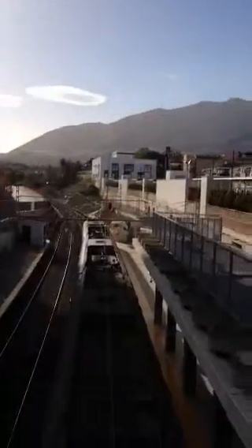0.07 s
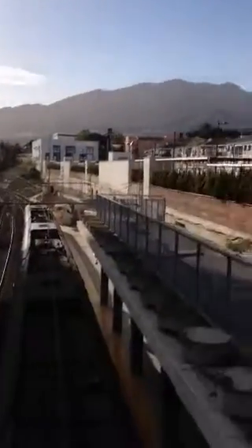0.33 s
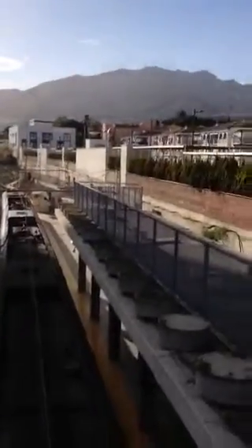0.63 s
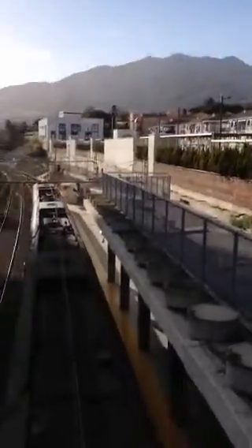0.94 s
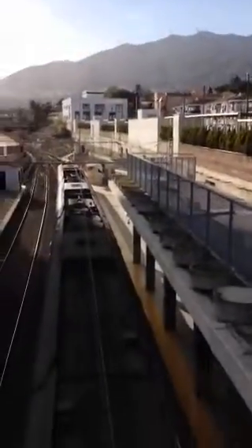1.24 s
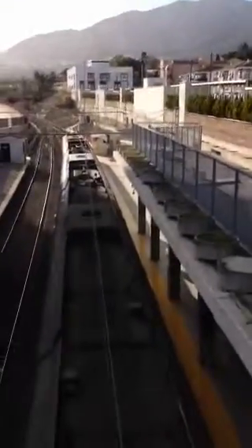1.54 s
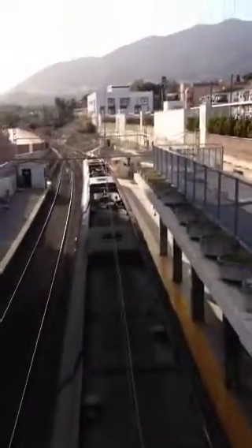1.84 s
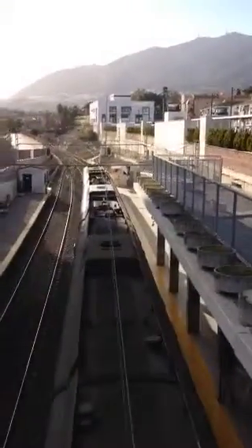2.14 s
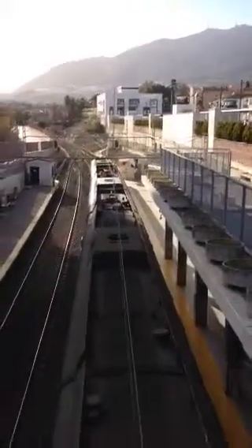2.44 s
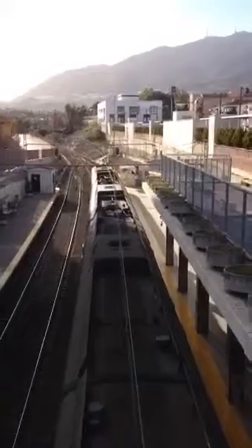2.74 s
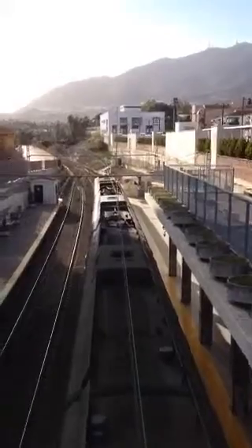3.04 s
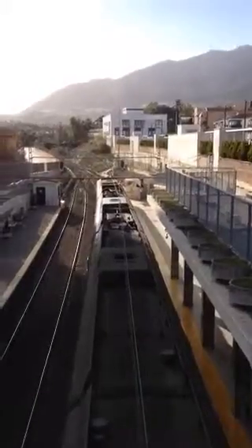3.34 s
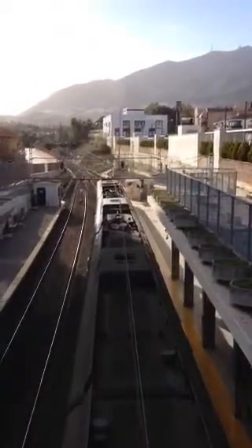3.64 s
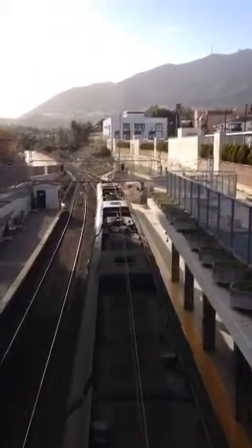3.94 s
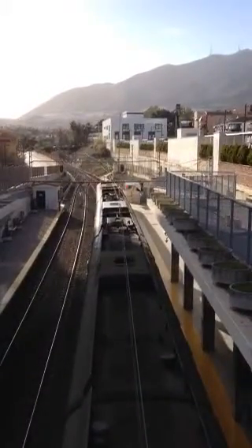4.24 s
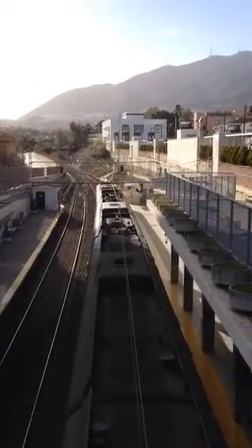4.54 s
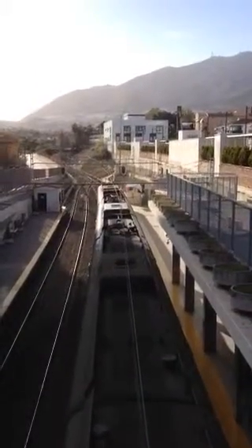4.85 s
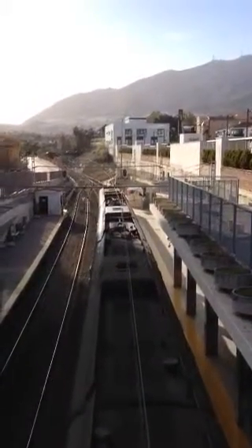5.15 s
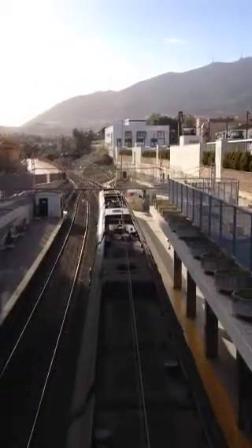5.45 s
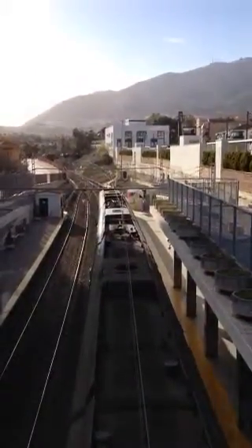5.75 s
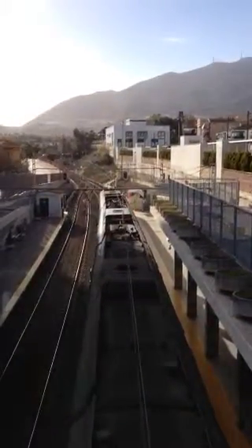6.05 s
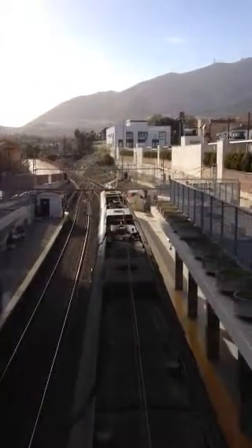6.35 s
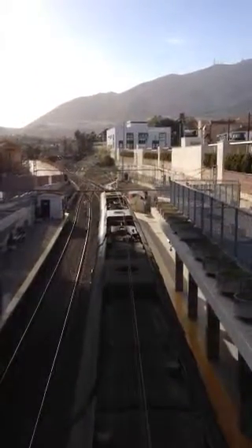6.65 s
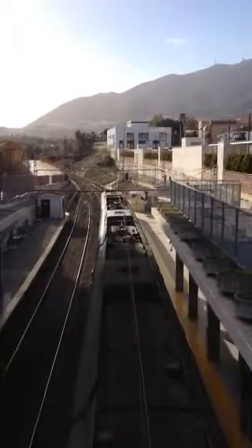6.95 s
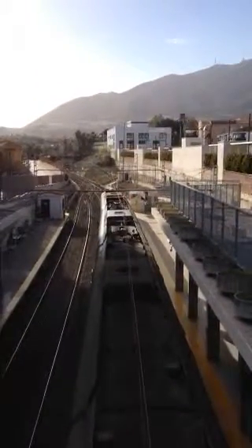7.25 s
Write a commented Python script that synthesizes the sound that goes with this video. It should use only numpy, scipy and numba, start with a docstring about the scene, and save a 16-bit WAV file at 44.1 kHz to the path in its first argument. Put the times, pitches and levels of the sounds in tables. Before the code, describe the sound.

An electric train stands at a station platform, its motors humming low and its cooling fans rushing steadily. After about a second and a half, a finger knocks and rubs loudly on the microphone several times and covers it. The rush cuts off and the sound turns dull and much quieter. A faint muffled hum with a little hiss carries on to the end.

```python
"""Standing train, covered microphone

An electric train stands at a platform below a footbridge: its motors and converter hum, its fans rush.
A finger rubs and knocks over the microphone port, then seals it. The narrowing leak cuts off
the rush, leaving a muffled hum and the microphone's own hiss."""
import sys
import numpy as np
from scipy import signal
from scipy.fft import rfft, irfft
from scipy.io import wavfile
from scipy.ndimage import uniform_filter1d, minimum_filter1d
from numba import njit

SR = 44100
rng = np.random.default_rng(int(sys.argv[2]) if len(sys.argv) > 2 else 0)


def dump_mix(stems):
    """Bounce the given channels to the path in sys.argv[1] as a 16-bit WAV at rate SR."""
    frames = np.atleast_2d(stems).T  # one column per channel
    limited = np.clip(frames, -1, 1)  # hard clip at full scale
    pcm = np.round(limited * 32767).astype(np.int16)
    wavfile.write(sys.argv[1], SR, pcm)


N = 321930
TIME = np.arange(N) / SR

WHINE_HZ, WHINE_DB, WHINE_FADE_S = 1235.5, -50.5, 0.077
MOVE_START_S, MOVE_END_S = 1.07, 1.3
# motor and converter tones: f/Hz, level/dB, change as the phone moves/dB, unsteadiness/0-1
MACHINE_TONES = [(147.3, -34, -2, .12), (212.4, -35, -11.5, 0.5), (296.3, -38, -3.5, 0.4),
                 (344.4, -45.5, -9.5, 0.6), (554.2, -44, -4, 0), (586.6, -47.5, -3.5, 1),
                 (879, -64, 12.5, 0.9), (1180, -62.5, 6.5, 0.39), (1170, -67, 2.5, 0.8),
                 (1564, -62, 6, 0.8), (1647, -67.5, 10, 0.6), (1880, -61, 3, 0.3)]
# thin whine: start/s, end/s
WHINE_SPANS = [(1.12, 1.9), (6.12, 7.3)]


def machines():
    """Motors and converter hum with a shared pitch waver; a thin whine comes and goes."""
    clock_s = np.cumsum(1 + 0.00064 * walk(1.8)) / SR
    # each tone has its own pattern over the platform, so moving shifts each level differently
    moved = np.interp(TIME, (MOVE_START_S, MOVE_END_S), (0, 1))
    hum = sum(undb(db + change_db * moved) * tone(hz, clock_s, sway)
              for hz, db, change_db, sway in MACHINE_TONES)
    whining = sum(swell(start, end, WHINE_FADE_S, WHINE_FADE_S) for start, end in WHINE_SPANS)
    return hum + undb(WHINE_DB) * whining * tone(WHINE_HZ, clock_s, sway=0.333)


# rushing air: f/Hz, density/(dB per Hz)
AIR_SPECTRUM = [(25, -101), (60, -90), (110, -68), (260, -60.5), (420, -68), (900, -68.5), (1500, -73.5),
                (2300, -79.5), (3400, -83), (4500, -79.5), (5300, -88), (7000, -83.5), (9500, -89.5),
                (12500, -87), (15000, -89.5)]
# duct and grille resonances: f/Hz, width/Hz, level/dB
DUCT_MODES = [(104.6, 18, -48), (164.4, 13, -49), (206.5, 15, -39), (284.6, 40, -42), (4650, 420, -56),
              (6150, 620, -58), (6860, 240, -59), (7520, 398, -59.5)]
# treble gain as the hand nears the port: t/s, level/dB
TREBLE_CURVE = [(0, -2.5), (.45, -1.5), (.8, 3), (1.25, 4.5), (1.42, 8.5), (1.52, 1.5)]


def fans():
    """Cooling air rushes; its turbulence rings ducts and grilles."""
    air = coloured(AIR_SPECTRUM) * undb(0.18 * walk(4))
    for hz, width_hz, db in DUCT_MODES:
        level = undb(db + 0.67 * walk(3))
        air += level * narrow_band(rng.standard_normal(N), hz, 0.86 * width_hz / hz)
    treble = signal.sosfilt(signal.butter(1, 5500, "high", fs=SR, output="sos"), air)
    treble_gain = undb(np.interp(TIME, *np.transpose(TREBLE_CURVE)))
    return air + (treble_gain - 1) * treble


OPEN_HZ = 17800
# presses closing the port: start/s, length/s, leak corner after/Hz, air pocket resonance after/Hz
FINGER_PRESSES = [(1.421, 0.059, 1643, 10200), (1.645, 0.091, 320, 1760), (2.23, 0.54, 68.6, 1590)]


def port():
    """Each press glides the leak corner and the trapped air's resonance down."""
    octaves = np.full((2, N), np.log2(OPEN_HZ))
    for start, length, *targets_hz in FINGER_PRESSES:
        progress = np.clip((TIME - start) / length, 0, 1)
        octaves += progress * (np.log2(targets_hz)[:, None] - octaves)
    return 2 ** octaves


def seal(sound, leak_hz, pocket_hz):
    """The leak takes 6 dB/octave; little passes above the trapped air's resonance."""
    # critically damped low + band/2 = one-pole slope
    leaked = filt(sound, "low", leak_hz, 2) + filt(sound, "band", leak_hz, 2) / 2
    return filt(leaked, "low", pocket_hz, 1.385)


SLIPS_PER_S, SKIN_HISS_HZ = 6000, 3020
DARKEN_OCT, FLATTEN_S, LIGHT_TOUCH_OCT = 0.16, 0.018, 0.11
# skin on the case: mid t/s, level/dB, rise/s, hold/s, fall/s, body/Hz, brightness/Hz, relative hiss/dB
RUB_STROKES = [(1.455, -18, 0.011, .02, .012, 302, 2650, -11),
               (1.652, -16, 0.054, 0.012, .015, 300, 1250, -22),
               (1.793, -11, 0.019, 0.006, 0.024, 176, 1027, -38),
               (1.92, -21.5, 0.011, 0.059, 0.015, 323, 1136, -37),
               (2.061, -31, 0.018, 0.011, 0.04, 290, 1280, -27.5)]


def rubs():
    """Skin sticks and slips in dense jerks: a dull roar through the case and a thin dry hiss."""
    slips = (rng.random(N) < SLIPS_PER_S / SR) * rng.standard_normal(N)
    slips += 0.21 * rng.standard_normal(N)
    hiss = unit(filt(filt(slips, "band", SKIN_HISS_HZ, 0.85), "low", 5700, 4.1))
    out = np.zeros(N)
    for t, db, rise, hold, fall, body_hz, bright_hz, hiss_db in RUB_STROKES:
        pressure = swell(t - hold / 2, t + hold / 2, rise, fall)
        # duller as the fingertip flattens, and under a light touch
        flattening = np.tanh((TIME - t) / FLATTEN_S)
        brightness = 2 ** (-DARKEN_OCT * flattening - LIGHT_TOUCH_OCT * (1 - pressure))
        friction = muffled(slips, bright_hz * brightness) / np.sqrt(brightness)
        body = unit(filt(friction, "band", body_hz, 0.6))
        roar = unit(filt(friction, "high", 0.8 * body_hz)) + undb(-4) * body
        out += undb(db) * pressure * (unit(roar) + undb(hiss_db) * hiss)
    return out


KNOCK_OPEN_HZ, KNOCK_SEALED_HZ = 2300, 1120
# fingertip knocks: t/s, peak level/dB
FINGER_KNOCKS = [(1.4421, -10.5), (1.4439, -5), (1.46, -16.5), (1.6334, -12), (1.659, -11), (1.775, -10.5),
                 (1.8037, -7.5), (2.0667, -15.5), (2.2282, -7)]


def knocks(leak_hz, pocket_hz):
    """One pressure pulse per tap: bright on the open port, dull once sealed, where trapped air rings."""
    out, push = np.zeros(N), signal.unit_impulse(2048)
    for t, db in FINGER_KNOCKS:
        now = int(t * SR)
        openness = leak_hz[now] / OPEN_HZ
        bright_hz = KNOCK_SEALED_HZ + openness * (KNOCK_OPEN_HZ - KNOCK_SEALED_HZ)
        thud = filt(muffled(push, bright_hz), "low", pocket_hz[now], damping=0.64)
        add_pulse(out, t, db, thud + 1.8 * filt(thud, "band", 210, 0.81))
    return out


# light fingertip slides: start/s, end/s, level/dB, f/Hz
DRY_SLIDES = [(1.427, 1.443, -30.5, 2980), (1.93, 2.05, -62.5, 4350), (2.135, 2.246, -72, 4500),
              (2.16, 2.19, -71, 14200), (2.316, 2.51, -73, 2260)]


def slides():
    """Skin barely touching the case hisses in one narrow band."""
    friction, out = rng.standard_normal(N), np.zeros(N)
    for start, end, db, hz in DRY_SLIDES:
        contact = swell(start, end, rise_s=0.016, fall_s=0.016)
        out += undb(db) * contact * narrow_band(friction, hz, damping=0.58)
    return out


# dry ticks of the case: t/s, peak level/dB, f/Hz
CASE_TICKS = [(1.5062, -31, 4660), (1.524, -34, 4500), (1.8045, -51, 6050), (2.055, -35, 2450),
              (2.814, -43.5, 1100)]


def ticks():
    """The case clicks faintly under the grip."""
    out, push = np.zeros(N), signal.unit_impulse(2048)
    for t, db, hz in CASE_TICKS:
        click = filt(push, "band", hz, 1.1)
        add_pulse(out, t, db, filt(click, "low", 1.2 * hz))
    return out


# microphone self-noise: f/Hz, density/(dB per Hz)
MIC_SPECTRUM = [(30, -108), (1500, -111), (3000, -114.5), (5000, -117), (9500, -125), (12000, -121),
                (15000, -115)]


def mic_hiss():
    """The microphone's own steady noise, unaffected by the seal."""
    return coloured(MIC_SPECTRUM)


def undb(db):
    """Decibels to gain."""
    return 10 ** (np.asarray(db) / 20)


def unit(x):
    """Scale to rms 1."""
    return x / np.sqrt(np.mean(x ** 2))


def walk(rate_hz):
    """Smooth random drift, rms 1."""
    hz = np.arange(N // 2 + 1) * SR / N
    return unit(irfft(rfft(rng.standard_normal(N)) * np.exp(-(hz / rate_hz) ** 2), N))


def tone(hz, clock_s, sway):
    """Sine drifting in level and phase, rms 1."""
    drift = 1 + sway * (walk(4) + 1j * walk(4))
    return unit(np.real(drift * np.exp(2j * np.pi * (hz * clock_s + rng.random()))))


def coloured(points):
    """Noise shaped by (Hz, dB per Hz) points."""
    hz, db = np.transpose(points)
    bins_hz = np.maximum(np.arange(N // 2 + 1) * SR / N, 1)
    gain = undb(np.interp(np.log(bins_hz), np.log(hz), db))
    return irfft(rfft(rng.standard_normal(N)) * gain, N) * np.sqrt(SR / 2)


@njit
def svf(x, g, damping):
    """State-variable filter, g the prewarped corner per sample; rows low, band, high."""
    y, band_state, low_state = np.empty((3, len(x))), 0., 0.
    for i in range(len(x)):
        band = (band_state + g[i] * (x[i] + 1e-18 - low_state)) / (1 + g[i] * (g[i] + damping))
        low = low_state + g[i] * band
        band_state, low_state = 2 * band - band_state, 2 * low - low_state
        y[0, i], y[1, i], y[2, i] = low, damping * band, x[i] - damping * band - low
    return y


def filt(x, kind, hz, damping=np.sqrt(2)):
    """Two-pole low, band or high pass; hz may move."""
    g = np.tan(np.pi * np.minimum(hz, 0.45 * SR) / SR) * np.ones(len(x))
    return svf(x, g, float(damping))[["low", "band", "high"].index(kind)]


def narrow_band(x, hz, damping):
    """Two band passes in series, rms 1."""
    return unit(filt(filt(x, "band", hz, damping), "band", hz, damping))


def muffled(x, hz):
    """Flesh and the tiny port pass one band: steep above hz, little deep bass."""
    for damping in (1.9, 1.4, 0.62):
        x = filt(x, "low", hz, damping)
    return filt(filt(x, "high", 170, 0.6), "high", 68, 0.77)


def swell(start, end, rise_s, fall_s):
    """Exponential rise, hold at 1 from start to end, exponential fall."""
    return np.exp(-np.maximum(np.maximum((start - TIME) / rise_s, (TIME - end) / fall_s), 0))


def add_pulse(out, t, peak_db, pulse):
    """Mix in a peak-scaled pulse at time t."""
    start = int(t * SR)
    out[start:start + len(pulse)] += undb(peak_db) * pulse / np.abs(pulse).max()


def scene():
    """The train comes through the closing port; the finger acts on port and case directly."""
    leak_hz, pocket_hz = port()
    train = seal(machines() + fans(), leak_hz, pocket_hz)
    handling = rubs() + slides() - knocks(leak_hz, pocket_hz) - ticks()
    return (train + handling)[None]


def record(dry):
    """The phone adds hiss, limits the hardest bumps and cuts the top."""
    ceiling, top_hz = 0.7, 15250
    sound = dry + mic_hiss()
    gain = ceiling / np.maximum(np.abs(sound), ceiling)
    held = minimum_filter1d(gain, size=361)  # 8 ms around each peak
    smoothed = uniform_filter1d(uniform_filter1d(held, size=181), size=181)
    return signal.sosfilt(signal.ellip(10, 0.1, 80, top_hz, fs=SR, output="sos"), smoothed * sound)


dry = scene()
out = record(dry)
dump_mix(out)
```